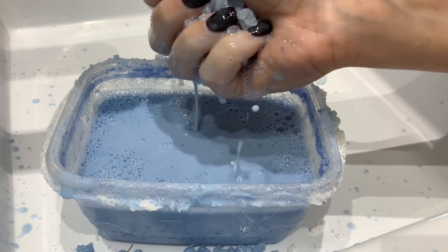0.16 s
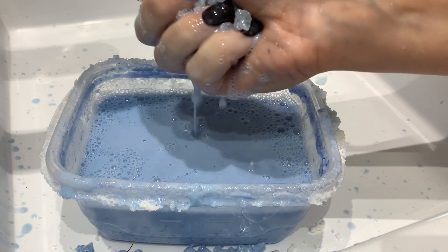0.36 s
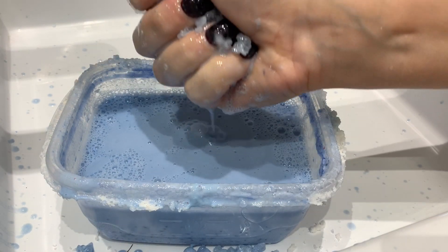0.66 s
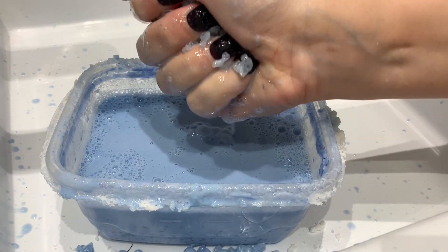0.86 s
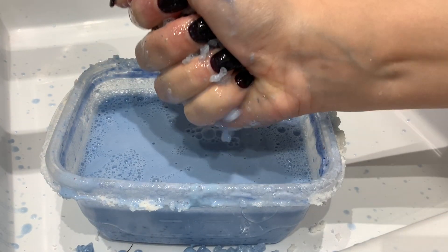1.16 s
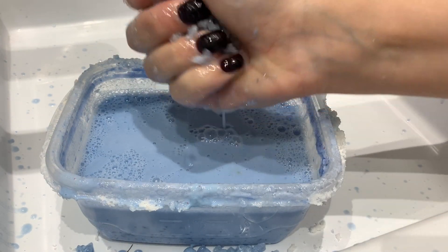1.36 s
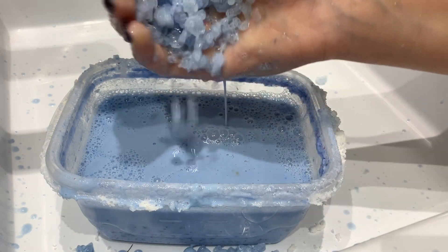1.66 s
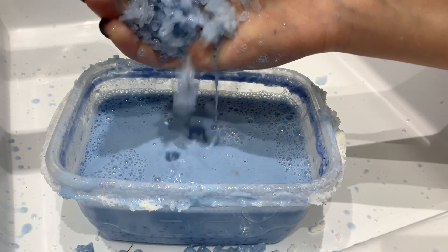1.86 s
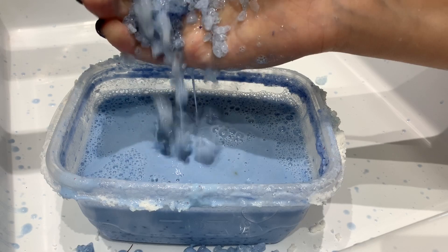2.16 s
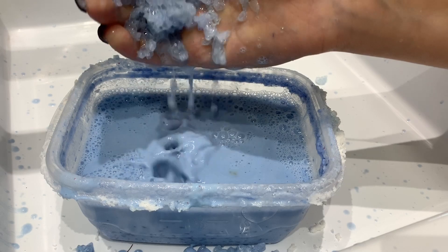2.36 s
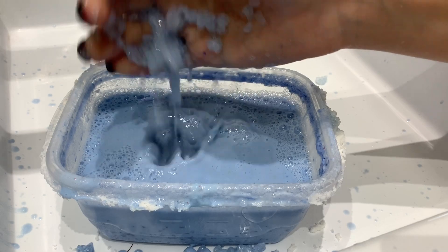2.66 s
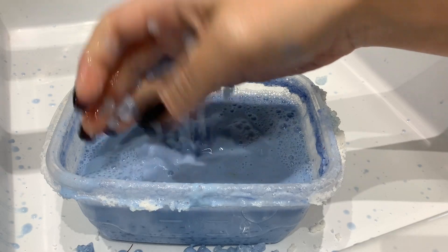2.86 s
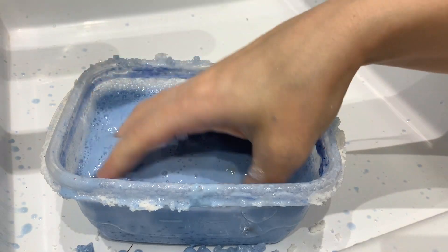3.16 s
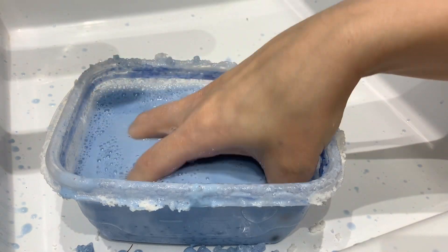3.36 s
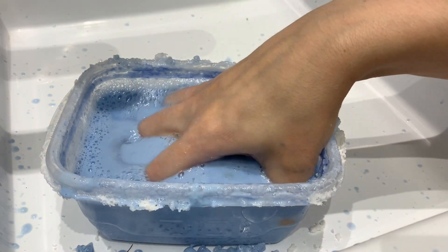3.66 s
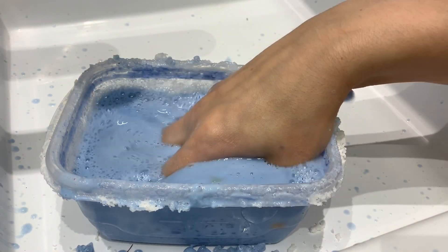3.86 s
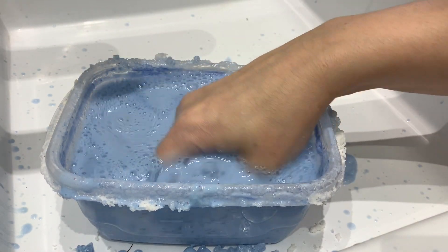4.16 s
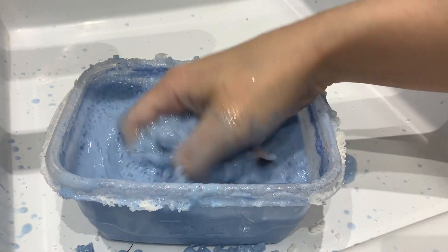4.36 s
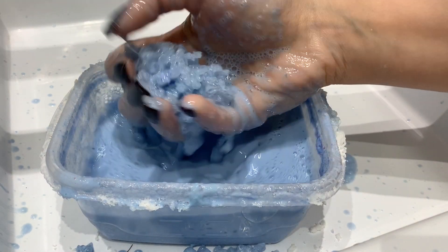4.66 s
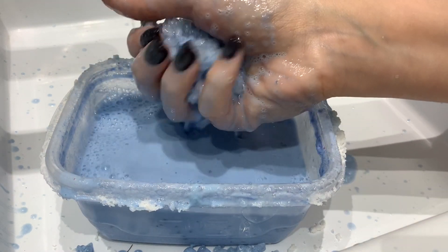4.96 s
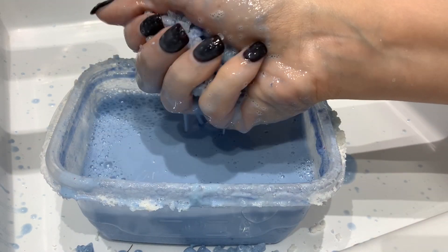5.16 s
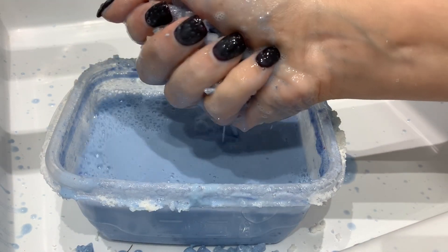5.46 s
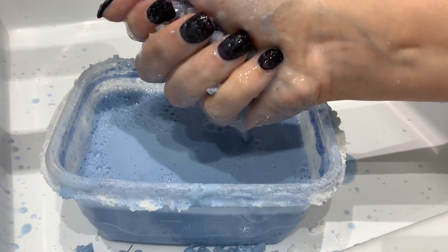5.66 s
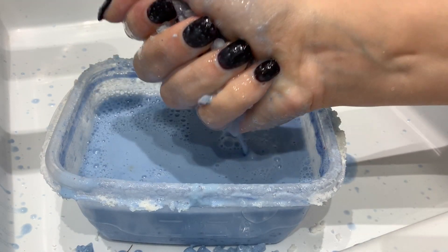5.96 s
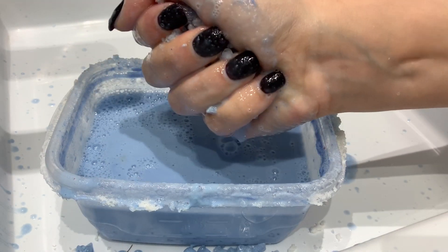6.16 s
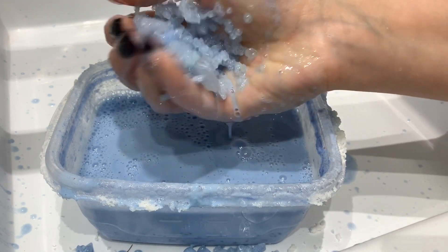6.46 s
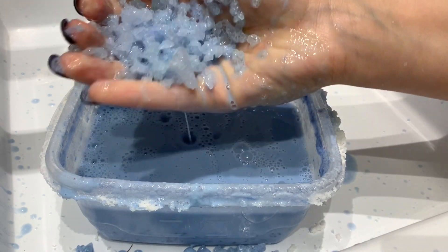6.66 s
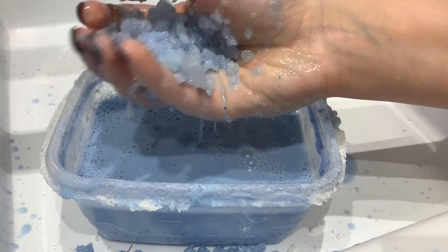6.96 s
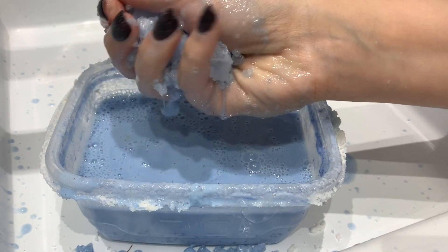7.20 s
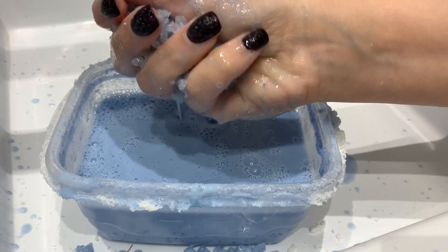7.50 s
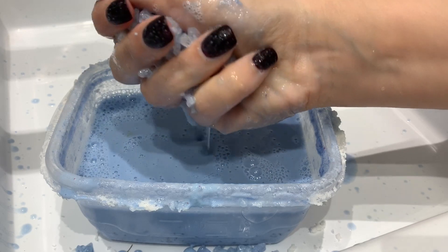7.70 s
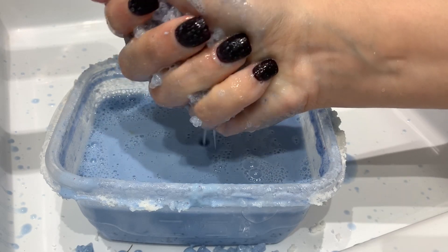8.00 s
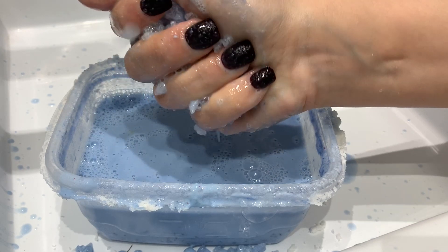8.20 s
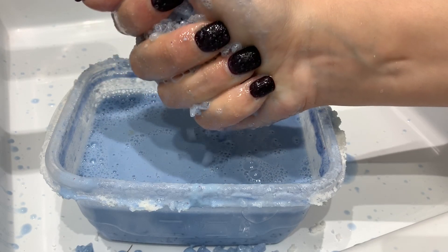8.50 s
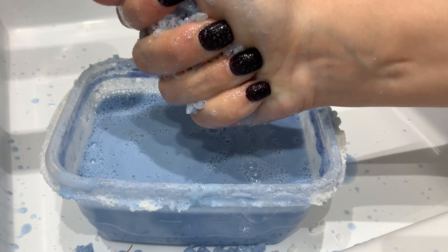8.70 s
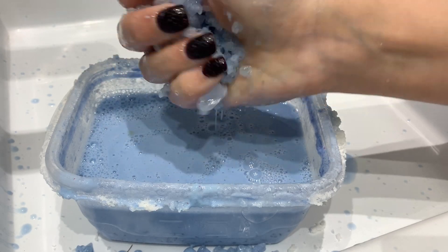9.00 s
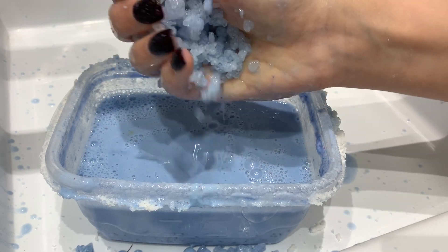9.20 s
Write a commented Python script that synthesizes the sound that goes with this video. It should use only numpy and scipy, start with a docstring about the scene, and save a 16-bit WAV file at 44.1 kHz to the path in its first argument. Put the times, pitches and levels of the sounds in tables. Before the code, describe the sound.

A steady low machine hum and faint room hiss run throughout. Very close, a few small drips open the scene, then from about 0.3 to 1.2 s a fist squeezes wet foamy crumbs: quick, crisp crackles with hollow, squelchy pops and dull tub knocks. A brief quiet follows. From 1.7 to 3 s come loose, bright wet ticks, fizzing and plopping drops, with a sharper smack near 2.7. From 3 to 4.9 s the hand dips and stirs: soft sloshing, gurgling, little bubbles, and muted low bumps around 3.2, 3.5 and 3.8. A second squeeze from 5.1 to 6.2 s is juicier, with the strongest thumps near 5.7 and 5.8. Light fizz and sparse ticks lead to a long, dense crackling squelch from 7.5 to 8.8 s, then scattered wet clicks and a few drops until about 9.3. Short plastic and basin reflections.

```python
"""A machine hums low in a room while foam fizzes and drops fall: a hand squeezes wet sponge crumbs
over a plastic tub in a sink, close by. Air pockets then burst in short crackling squelches that ring the tub.
Crackle, fizz and seeping are filtered random pops; bubbles are chirped decaying sines; tub and walls are
sums of damped modes. Rim and basin echo the hand, and two ports receive the sound with differing phase and level."""
import sys
import numpy as np
from scipy import signal
from scipy.fft import rfft, irfft, next_fast_len
from scipy.io import wavfile
from scipy.ndimage import uniform_filter1d

SR = 44100
rng = np.random.default_rng(int(sys.argv[2]) if len(sys.argv) > 2 else 0)


def master(y):
    """Save y as 16-bit WAV."""
    cut = np.clip(np.atleast_2d(y).T, -1, 1)
    pcm = np.round(cut * 32767)  # scale
    wavfile.write(sys.argv[1], SR, pcm.astype(np.int16))


N = 411894


def gain_of(db):
    """Decibels: 20 dB is a tenfold amplitude."""
    return 10 ** (np.asarray(db) / 20)


def evened(x):
    """Normalization to unit rms."""
    return x / np.sqrt(np.mean(x ** 2) + 1e-20)


def over_pitch(points, hz):
    """Interpolation of a spectrum along logarithmic frequency."""
    f, value = np.transpose(points)
    return np.interp(np.log(hz + 1), np.log(f + 1), value)


def over_time(points, t):
    """Linear interpolation of a level contour."""
    s, db = np.transpose(points)
    return np.interp(t, s, db)


def add(mix, start_s, sound):
    """Superposition of a sound onto the mix, cut off at its end."""
    part = mix[round(start_s * SR):][:len(sound)]
    part += sound[:len(part)]


def smoothed(x, width, axis=-1):
    """Slow random fluctuation: two moving averages, then unit rms."""
    once = uniform_filter1d(x, width, axis=axis)
    return evened(uniform_filter1d(once, width, axis=axis))


def coloured(x, spectrum):
    """Linear filtering by a spectrum, keeping the power of white noise."""
    size = next_fast_len(N + 4096)
    gain = evened(gain_of(over_pitch(spectrum, np.fft.rfftfreq(size, 1 / SR))))
    return irfft(rfft(x, size) * gain, size)[..., :N]


def joined(low, high, hz=7100.0):
    """Crossover: the lower band of one sound with the upper band of another."""
    low_pass = signal.butter(2, hz, "low", fs=SR, output="sos")
    high_pass = signal.butter(2, hz, "high", fs=SR, output="sos")
    return signal.sosfilt(low_pass, low) + signal.sosfilt(high_pass, high)


def rung(push, modes):
    """Modal resonance: damped modes of alternating sign answer a push; white noise keeps its power."""
    t = np.arange(4096) / SR
    ring = np.zeros(len(t))
    for k, (hz, width, db) in enumerate(modes):
        decay = np.exp(-np.pi * width * t)  # a wider resonance dies sooner
        ring += (-1) ** k * gain_of(db) * np.sqrt(width) * decay * np.sin(2 * np.pi * hz * t)
    return signal.oaconvolve(push, ring / np.linalg.norm(ring))[:N]


def grit(spread_db, per_s):
    """Shot noise: random pops of random sign and exponentially spread dB size, rms 1."""
    size = gain_of(spread_db * np.minimum(rng.exponential(1, N), 5))
    sign = rng.choice([-1., 1.], N)
    return evened(size * sign * (rng.random(N) < per_s / SR))


def bubble(hz, cycles, glide):
    """Bubble resonance: an air pocket rings for some cycles, its pitch rising as it shrinks."""
    turns = np.arange(round(5 * cycles * SR / hz)) * hz / SR
    envelope = (1 - np.exp(-turns / 0.4)) * np.exp(-turns / cycles)
    return envelope * np.sin(2 * np.pi * turns * (1 + glide * turns))


# Steady motor tones: pitch_hz [Hz], level_db [dB rms, before the port tilt]
HUM_TONES = [(23.4, -29), (96.0, -35), (164, -59.5)]
# Spectrum of the room noise: frequency_hz [Hz], density_db [dB per Hz, relative]
AIR_SPECTRUM = [(28, -20), (38, 11), (60, -2.5), (85, -6), (130, -11), (180, -11), (290, -24.5),
                (600, -25.5), (1000, -26), (3500, -34.5), (7000, -30.5), (12000, -103), (16000, -72)]
# Left-right coherence of the room noise: frequency_hz [Hz], likeness [0 to 1]
AIR_LIKENESS = [(130, 0.97), (250, 0.84), (600, 0.15), (1400, 0.25), (5000, 0.097)]
AIR_DB = -37.5  # rms level of the room noise before the port tilt


def room():
    """Tonal and diffuse sound: wavering motor tones over a partly coherent broad rumble and hiss."""
    t = np.arange(N) / SR
    waver_db = .5 * smoothed(rng.standard_normal(N), 6000)
    hum = sum(np.sqrt(2) * gain_of(db + waver_db) * np.sin(2 * np.pi * (hz * t + rng.random()))
              for hz, db in HUM_TONES)
    left, other = rfft(rng.standard_normal((2, N)))
    alike = np.clip(over_pitch(AIR_LIKENESS, np.fft.rfftfreq(N, 1 / SR)), 0, 1)
    air = irfft([left, alike * left + np.sqrt(1 - alike ** 2) * other], N)
    return hum + gain_of(AIR_DB) * coloured(air, AIR_SPECTRUM)


# Spectrum of the popping foam: frequency_hz [Hz], level_db [dB, relative]
FIZZ_SPECTRUM = [(2500, -24), (4300, -3), (5500, 6), (7000, 7.5), (7700, 6.5), (8500, 3.5), (10000, 3),
                 (12500, -2), (15100, -2.5), (15900, -22)]


def fizz(fizz_gain, a, b):
    """Clustered shot noise: tiny foam bubbles pop in clumps, the treble clumping differently."""
    small = gain_of(4.8 * a) * grit(spread_db=0.0, per_s=7000.)
    smaller = gain_of(1.7 * a + 1.23 * b) * grit(spread_db=4.0, per_s=5300.0)
    return coloured(gain_of(-2.0) * fizz_gain * joined(small, smaller), FIZZ_SPECTRUM)


# Spectrum of wet slaps and seeping: frequency_hz [Hz], level_db [dB, relative]
SLAP_SPECTRUM = [(500, -40), (1250, 3.5), (1800, 9), (2500, 6), (3300, 7), (4400, 6), (6000, -70)]


def seepage(seep_gain, a, c):
    """Modulated shot noise: liquid seeps between the crumbs in fluctuating pops."""
    pops = gain_of(1.47 * a + 2.9 * c) * grit(spread_db=2.5, per_s=5000.)
    return gain_of(-5.5) * coloured(seep_gain * pops, SLAP_SPECTRUM)


def bubble_swarm(pitches_hz, spread_db, per_s, cycles, glide):
    """Superposed bubble resonances struck at random, each pitch at equal power, rms 1."""
    voices = [signal.oaconvolve(grit(spread_db, per_s), bubble(hz, cycles, glide))[:N] for hz in pitches_hz]
    return evened(sum(evened(voice) for voice in voices))


# Modes of the tub: pitch_hz [Hz], width_hz [Hz], level_db [dB, relative]
TUB_MODES = [(405.7, 9.7, -1), (575, 214, 8), (944, 89, 10.5), (1275, 140, 9.5), (1650, 190, 9),
             (2200, 910, 9), (3000, 790, 5.5)]


def wash(stir_gain, seep_gain, a, c):
    """Driven resonance: sloshing rings the tub, with gurgling and trickling bubbles."""
    pops = gain_of(2.4 * a + 1.5 * c) * grit(spread_db=1.0, per_s=6000.)
    tub = rung(stir_gain * pops, TUB_MODES)
    deep = np.clip(stir_gain / seep_gain, 0, 1) ** 2.0  # thin trickles hardly stir the low modes
    tub = joined(deep * tub, tub, hz=680.0)
    gurgle = bubble_swarm(np.geomspace(480, 3200, 12), spread_db=2.5, per_s=300., cycles=9.2, glide=0.0103)
    trickle = bubble_swarm(np.geomspace(1300, 4300, 8), spread_db=4.5, per_s=47.0, cycles=17.0, glide=0.0104)
    flow = tub + gain_of(-3.0) * seep_gain * trickle
    return gain_of(-8.0) * flow + gain_of(-12.0) * stir_gain * deep * gurgle


# Timed bursting air pockets, loud and faint: start_s [s], level_db [crack dB, relative],
# ring_db [dB over the crack], pitch_hz [Hz], length_s [s, held to 0.0005-0.012 when played]
TIMED_POCKETS = [(0.2704, -16, -20, 1006, 0.0028), (0.3298, -20, 1, 970, 0.0034),
                 (0.403, -15.5, -1.5, 915, 0.0016), (0.438, -12.5, 3, 930, 0.0022),
                 (0.498, -8.5, -4.5, 562, 0.002), (0.5693, -7, -0.5, 970, 0.0024),
                 (0.6355, -5.5, 2, 580, 0.002), (0.698, -6.5, -8.5, 575, 0.0015),
                 (0.7459, -4.5, 1.5, 1190, 0.0025), (0.8233, -4.5, -7, 1240, 0.0024),
                 (.889, -3, -8.5, 590, 0.0023), (0.9316, -13.5, 1, 1365, 0.0015),
                 (0.9542, -0.5, -6, 580, 0.0018), (1.011, -8, -8, 1220, 0.0017),
                 (1.0177, -0.5, -3, 600, 0.0015), (1.038, -10, -16, 520, 0.0031),
                 (1.1347, -6, -11, 1080, 0.00086), (1.185, -4.5, -1.5, 956, 0.0024),
                 (1.6915, -12.5, -22, 850, 0.00073), (1.991, -8, -20, 1400, 0.00049),
                 (2.055, -11, -37, 790, 0.00046), (2.043, -19, -39, 1360, 0.00058),
                 (2.23, -20, -23, 1210, 0.002), (2.272, -13, -16, 1330, 0.0034),
                 (2.2864, -15, -8, 1320, 0.0031), (2.395, -14, -23.5, 830, 0.001),
                 (2.687, 2, -21, 1040, 0.0013), (2.746, -22, -15, 1100, 0.0023),
                 (2.8233, -10, -12.5, 1420, 0.0036), (3.024, -10.5, -46, 790, 0.0014),
                 (3.031, -18, -38, 980, 0.0018), (4.8104, -12.5, -15, 1350, 0.00065),
                 (5.205, -17.5, -12, 804, 0.0034), (5.249, -19, -2.5, 922, 0.0025),
                 (5.319, -6.5, -6.5, 980, 0.00072), (5.37, -10, -4.5, 1470, 0.0087),
                 (5.3956, -10.5, -4.5, 940, 0.0049), (5.412, -3, -17, 1390, 0.0013),
                 (5.457, -10, -7.5, 1000, 0.0048), (5.487, -10.5, -4, 1000, 0.0028),
                 (5.5388, -6.5, -4.5, 1390, 0.0022), (5.546, -12, -4.5, 564, 0.0033),
                 (5.581, -13, -2, 1340, 0.002), (5.6848, -6, 2, 1017, 0.0014),
                 (5.79, -23, 7.5, 1320, 0.0017), (5.8194, 1.5, -5.5, 1196, 0.0015),
                 (5.906, -5, -3.5, 1430, 0.0019), (5.9542, -7.5, 0.5, 1400, 0.00048),
                 (5.9688, -9.5, -2.5, 550, 0.0038), (6.0496, -3.5, -6.5, 587, 0.0016),
                 (6.0778, -3, -11.5, 580, 0.0009), (6.163, -4.5, -6.5, 560, 0.0026),
                 (7.5198, -15, -4.5, 1080, 0.0034), (7.548, -16.5, -5.5, 1390, 0.0033),
                 (7.621, -0.5, -16, 1200, 0.00065), (7.699, -9.5, -42, 1400, 0.0026),
                 (7.742, -9.5, -12, 1190, 0.0016), (7.809, -16, -6, 1230, 0.0013),
                 (7.8247, -5.5, -12.5, 1170, 0.0033), (7.877, -6.5, -2.5, 1230, 0.0041),
                 (7.9256, -13, -8, 460, 0.0075), (7.948, -11, -7.5, 620, 0.0038),
                 (7.994, -11, -8, 950, 0.0028), (8.0088, -4, -8.5, 600, 0.0024),
                 (8.0286, -5, -15, 1000, 0.00049), (8.051, -5.5, -10, 585, 0.0025),
                 (8.0602, 2, -13.5, 940, 0.00045), (8.113, -9, -7, 1220, 0.0012),
                 (8.154, -14, -22, 760, 0.00043), (8.181, -1.5, -7, 1140, 0.0025),
                 (8.195, -10, -27, 915, 0.0041), (8.2196, -1, -18, 1160, 0.00031),
                 (8.2468, -10.5, -6, 582, 0.0031), (8.323, -20, 5, 580, 0.00085),
                 (8.382, -9.5, 1, 566, 0.00094), (8.42, -6.5, -34, 930, 0.0019),
                 (8.45, -13, -5, 1090, 0.0022), (8.491, -2.5, -27, 1220, 0.00055),
                 (8.5054, -9.5, -20, 546, 0.0013), (8.5243, -7.5, -10, 1250, 0.0025),
                 (8.564, -16, 2.5, 1360, 0.001), (8.5905, -5, -8, 520, 0.0014),
                 (8.6597, -11, -1.5, 1010, 0.0032), (8.7801, -7, -6.5, 1450, 0.0014),
                 (8.998, -15.5, -4.5, 1250, 0.0034), (0.0754, -19, -5, 1700, 0.0034),
                 (0.091, -22, -16, 1860, 0.0025), (0.191, -19, -34, 2340, 0.0022),
                 (0.304, -22.5, -2, 980, 0.0022), (0.5396, -15, -4, 940, 0.001),
                 (0.624, -19, -1, 1730, 0.0018), (0.7068, -11, -13, 580, 0.0014),
                 (1.108, -16.5, 3.5, 1000, 0.00096), (1.143, -27, -11, 1160, 0.0013),
                 (1.7505, -18, -28, 1560, 0.0011), (1.762, -9.5, -24, 2270, 0.0009),
                 (1.805, -15, -45, 2280, 0.0013), (1.82, -26, -36, 2380, 0.0017),
                 (1.971, -15, -31, 1750, 0.0014), (2.0944, -9, -31, 2090, 0.00094),
                 (2.106, -30.5, -19, 2090, 0.001), (2.135, -25, -25, 2390, 0.0014),
                 (2.19, -29, -25, 2270, 0.0015), (2.367, -21, -24, 900, 0.0015),
                 (2.414, -19, -17, 1280, 0.0015), (2.534, -19.5, -18, 2300, 0.001),
                 (2.5553, -17, -19, 2360, 0.00099), (2.5705, -15, -12, 1730, 0.00096),
                 (2.629, -24, 1, 2290, 0.0013), (2.7555, -10.5, -12, 1050, 0.0016),
                 (2.9144, -16, -23, 1960, 0.0013), (2.931, -13, -25, 1910, 0.0012),
                 (5.13, -17.5, -5, 1690, 0.0012), (5.148, -17, -11, 1640, 0.0021),
                 (5.1678, -31, -21, 2100, 0.0015), (5.221, -15, -22, 2390, 0.0013),
                 (5.431, -14, -12, 990, 0.0015), (5.933, -18, -10, 1320, 0.0015),
                 (6.454, -14.5, -11, 2150, 0.0014), (6.5402, -24, -25, 1850, 0.0014),
                 (6.5541, -15.5, -27, 1910, 0.00095), (6.5947, -31, -20, 2100, 0.0013),
                 (6.923, -20.5, -29, 810, 0.00078), (7.2163, -16, -16, 2360, 0.002),
                 (7.342, -20, -30, 1210, 0.0015), (7.36, -27, -22, 1630, 0.0013),
                 (7.6447, -29, -13, 1400, 0.0014), (7.714, -12, -12, 2090, 0.0016),
                 (7.759, -16.5, -4, 1270, 0.00067), (7.774, -18, -19, 1220, 0.0015),
                 (7.865, -23, -5, 1540, 0.0012), (7.962, -9, -16, 1320, 0.0013),
                 (7.979, -13, -2, 2390, 0.0016), (8.022, -15, -5, 1240, 0.0017),
                 (8.04, -15, -5, 1720, 0.0021), (8.09, -25, 8, 1230, 0.0016),
                 (8.233, -17, -10, 566, 0.0021), (8.2613, -23, 5, 580, 0.0016),
                 (8.3589, -20, -21, 1890, 0.00064), (8.3776, -6.5, -41.5, 880, 0.0013),
                 (8.4764, -11.5, -7.5, 590, 0.00065), (8.533, -24, 0, 1210, 0.0012),
                 (8.571, -16, -5, 573, 0.0021), (8.6284, -25, 6, 580, 0.0013),
                 (8.6376, -21, -11, 570, 0.0018), (8.701, -13, -13, 900, 0.0012),
                 (9.02, -15, -11, 1640, 0.0026), (9.039, -15, -9, 2040, 0.0016),
                 (9.1874, -19, -29, 2390, 0.0014), (9.2055, -15.5, -24, 1920, 0.0014),
                 (9.2605, -21, -4, 2090, 0.0016)]
AFTER_S = 0.038  # amplitude decay time of the rush into a burst pocket
SWELL_S = 0.0052  # the rush takes a moment to set in, and the basin echoes to arrive
BEFORE_S = 0.0028  # fade-in time of the level ahead of each burst


def rush(hollow):
    """Energy relaxation: a level climbs into each timed burst and dies; hollow weighs in the ring level."""
    power = np.zeros(N)
    for s, db, ring_db, *_ in TIMED_POCKETS:
        add(power, s, gain_of([2 * (db + hollow * ring_db)]))
    after = signal.lfilter([1], [1, -np.exp(-2 / (AFTER_S * SR))], power)
    after = signal.oaconvolve(after, np.hanning(round(2 * SWELL_S * SR)) / (SWELL_S * SR))[:N]
    before = signal.lfilter([1], [1, -np.exp(-2 / (BEFORE_S * SR))], power[::-1])[::-1]
    return np.sqrt(abs(after) + before)


# Foam worked between the fingers: start_s [s], level_db [wringing dB, relative]
WRINGING = [(0, -34.5), (.15, -34.5), (.35, -50), (.55, -36.5), (1.2, -62), (1.3, -50), (1.5, -38),
            (1.8, -37), (2.05, -37), (2.3, -30.5), (2.4, -42), (2.65, -33.5), (2.8, -31.5), (3.0, -47),
            (3.3, -49), (3.45, -39.5), (3.8, -38), (3.95, -59), (4.1, -38), (4.2, -57), (4.4, -35),
            (4.6, -44.5), (4.9, -46), (5.0, -36), (5.2, -34), (5.5, -63), (5.7, -38), (6.15, -70),
            (6.3, -50), (6.4, -34), (6.6, -35), (6.8, -71), (6.9, -49.5), (7.1, -42), (7.25, -34),
            (7.8, -37), (8.1, -36), (8.55, -35), (8.9, -46), (9.0, -30.5), (9.1, -36.5), (9.34, -43)]
# Liquid moved in the fist and the tub: start_s [s], level_db [slosh dB, relative]
SLOSHING = [(0, -35), (.25, -42.5), (.5, -29.5), (1.15, -32), (1.3, -41), (1.8, -53), (2.3, -65),
            (2.4, -38), (2.6, -44), (2.8, -35), (3.05, -44), (3.2, -30.5), (3.6, -26.5), (3.8, -33),
            (4.2, -36), (4.35, -35), (4.9, -43.5), (5.3, -32), (5.6, -37), (6.1, -53), (6.4, -35.5),
            (6.7, -50), (7.05, -42.5), (7.4, -43.5), (7.6, -34.5), (8.0, -31), (8.6, -32), (9.0, -41.5),
            (9.2, -57), (9.34, -61)]
# How much liquid seeps for a given wringing: start_s [s], level_db [dB over the wringing]
WETNESS_CURVE = [(0, 2.5), (.7, -5.5), (1.6, -1.5), (2.0, -4.5), (2.75, 0.5), (3.3, -2.5), (4.6, 1),
                 (5.3, 1.5), (5.9, -3), (6.5, 0), (7.3, -2.5), (8.3, -7), (9.34, -0.5)]
# Rush around each burst for fizz, seep and slosh in turn: level_db [dB relative to the crack]
RUSH_DB = (-24, -23, -18)
SEEP_FROM_SLOSH = 0.032  # share of the slosh level; seeping follows mostly the wringing


def foam():
    """Energy addition: steady handling and the rush around bursts together drive fizz, seeping and wash."""
    t = np.arange(N) / SR
    wring_db, slosh_db = over_time(WRINGING, t), over_time(SLOSHING, t)
    seep_db = wring_db + SEEP_FROM_SLOSH * (slosh_db - wring_db)
    fizz_after_db, seep_after_db, slosh_after_db = RUSH_DB
    fizz_gain = np.hypot(gain_of(wring_db), gain_of(fizz_after_db) * rush(0.024))
    seep_gain = np.hypot(gain_of(seep_db), gain_of(seep_after_db) * rush(0.15))
    stir_gain = np.hypot(gain_of(slosh_db), gain_of(slosh_after_db) * rush(0.73))
    seep_gain = seep_gain * gain_of(over_time(WETNESS_CURVE, t))
    a, b, c = smoothed(rng.standard_normal((3, N)), 170)  # shared random flutter clumps the pops
    return fizz(fizz_gain, a, b) + seepage(seep_gain, a, c) + wash(stir_gain, seep_gain, a, c)


# Drops and crumbs fall into the liquid: start_s [s], level_db [dB, relative], pitch_hz [bubble Hz]
DROPS = [(0.027, -22.5, 1060), (0.043, -30, 830), (0.075, -20, 1670), (0.096, -33, 910), (0.093, -23, 2300),
         (1.983, -23.5, 1910), (2.011, -30, 1380), (2.104, -24.5, 2080), (2.252, -21.5, 1290),
         (2.296, -24.5, 1050), (2.417, -22, 1186), (2.687, -14, 1010), (2.731, -21, 1140), (2.78, -23, 715),
         (2.825, -18.5, 1770), (2.85, -29, 1770), (2.936, -28, 1110), (3.107, -29.5, 975),
         (3.168, -30, 1170), (3.234, -26, 1160), (3.249, -35, 610), (3.289, -31, 1170), (3.455, -27.5, 600),
         (3.5, -29, 580), (3.54, -32, 540), (3.766, -27, 555), (3.599, -24, 725), (3.636, -41, 940),
         (3.831, -30, 613), (3.833, -24, 2310), (4.105, -33.5, 650), (4.29, -31, 610), (4.344, -25.5, 1220),
         (4.528, -33, 1140), (4.694, -31, 1270), (4.376, -26, 1240), (4.493, -30, 1880), (4.575, -29, 900),
         (4.618, -24, 1400), (4.922, -33, 2580), (4.962, -26, 2300), (6.429, -30, 910), (8.98, -24, 1680),
         (9.261, -24, 2100)]
SPLASH_DB, SPLASH_S = -14, 0.025  # spray of other bubbles: dB relative to the drop, decay time in s


def drips():
    """Bubble entrainment: each drop traps one ringing bubble, and a spray of others near its pitch follows."""
    out, t = np.zeros(N), np.arange(4000) / SR
    for s, db, hz in DROPS:
        add(out, s, gain_of(db) * bubble(hz, cycles=5.2, glide=0.0028))
        ring = bubble(1.106 * hz, cycles=1.52, glide=0.0098)
        spray = rng.standard_normal(len(t)) * np.exp(-t / SPLASH_S)
        splash = signal.fftconvolve(spray, ring / np.linalg.norm(ring))
        add(out, s, gain_of(db + SPLASH_DB) * splash)
    return out


SMALL_DB, SMALL_RING_DB, SMALL_S = 5, -18.5, 0.0012  # crack offset dB, mean ring over crack dB, base length s
SMALL_GROWTH, FULL_DB = 3, -36.5  # small pockets swell faster than the wringing, about this level in dB


def pockets(count=500):
    """Random point process: small pockets at random moments, growing with the wringing, join the timed ones."""
    s, ring, pitch, length = rng.random((count, 4)).T
    s = s * (N / SR - .05) + 0.01
    grip_db = FULL_DB + SMALL_GROWTH * (over_time(WRINGING, s) - FULL_DB)
    db = grip_db - 1.8 * over_time(WETNESS_CURVE, s) + SMALL_DB  # wetter foam cracks less
    ring_db = SMALL_RING_DB + 14 * (ring - .5)
    small = np.transpose([s, db, ring_db, 800 * 2.4 ** pitch, SMALL_S * (1.03 + length)])
    return np.concatenate([TIMED_POCKETS, small])


# Spectrum of the crackle: frequency_hz [Hz], level_db [dB, relative]
CRACK_SPECTRUM = [(2500, -25), (3300, -10.5), (4300, -7.5), (5500, 3), (7000, 5.5), (7700, 6), (8500, 7),
                  (10000, 2.5), (12500, -1), (15100, -3.5), (15900, -32)]
SLAP_DB, SLAP_PER_RING = -4.5, 0.51  # wet slap over the crack in dB: hollower pockets slap harder
TEAR, FALL = .5, 1.695  # rise and fall of a burst, as shares of its length
SNAP = 1.35  # exponent: how abruptly a burst ends


def squelches():
    """Impulsive excitation: a pocket tears in dense pops, slaps shut, rings at its pitch and shakes the tub."""
    crack, hiss, slap, shake, ring = np.zeros((5, N))
    t = np.arange(-300, 1200) / SR
    pops, spray = grit(spread_db=-0.5, per_s=14000.), grit(spread_db=1.5, per_s=14000.)
    for s, db, ring_db, hz, length in pockets():
        u = t / np.clip(length, .0005, .012)
        envelope = np.where(u < 0, np.exp(-abs(u / TEAR) ** 1.15), np.exp(-abs(u / FALL) ** SNAP))
        shape = gain_of(db) * envelope
        start = s + t[0]
        add(crack, start, shape)
        add(hiss, start, shape * gain_of(3.04 * rng.standard_normal()))  # brightness varies by burst
        add(slap, start, shape * gain_of(SLAP_DB + SLAP_PER_RING * ring_db))
        push_db = ring_db - 5.5 * np.log2(hz / 600)  # small pockets push less
        add(shake, start + 0.0018, shape * gain_of(push_db))
        struck = shape * spray[round(s * SR):][:len(t)]
        pocket = signal.fftconvolve(struck, bubble(hz, cycles=3.25, glide=0.0013))
        add(ring, start + 0.9 / hz, gain_of(db + ring_db) * pocket / abs(pocket).max())
    crackle = gain_of(-5.0) * coloured(joined(crack * pops, hiss * spray), CRACK_SPECTRUM)
    tub = gain_of(-5.5) * rung(shake * pops, TUB_MODES)
    slaps = gain_of(-4.5) * coloured(slap * spray, SLAP_SPECTRUM)
    return crackle + gain_of(-8.5) * ring + tub + slaps


# The hardest squeezes shake the tub: start_s [s], level_db [shove peak dB, relative]
SHOVES = [(0.43, -49), (0.564, -52), (0.636, -27), (0.752, -29.5), (0.96, -24), (1.02, -31), (1.681, -32),
          (2.686, -33), (5.681, -16), (5.821, -12.5), (5.968, -22), (6.053, -27), (6.166, -22.5),
          (8.012, -38)]
# Low wall modes of the tub: pitch_hz [Hz], width_hz [Hz], level_db [dB, relative]
WALL_MODES = [(183, 18, 8), (256, 7.8, 9), (317.6, 5.4, 11), (438, 11, -4)]


def thumps():
    """Forced and free vibration: a short shove is heard as a dull push and rings the low wall modes."""
    shove = np.zeros(N)
    for s, db in SHOVES:
        add(shove, s, gain_of(db) * np.hanning(60))
    push = signal.sosfilt(signal.butter(2, 160., "high", fs=SR, output="sos"), shove)
    return gain_of(-9.5) * rung(shove, WALL_MODES) + gain_of(-6.5) * push


# Fingers bump the tub floor: start_s [s], level_db [dB, before onset and decay], pitch_hz [Hz]
FLOOR_BUMPS = [(3.247, -30, 106), (3.547, -32, 112), (3.79, -24.5, 109)]


def bumps():
    """Damped oscillation: a soft, slow ring of the tub floor, falling 60 dB in 0.3 s."""
    out, t = np.zeros(N), np.arange(8000) / SR
    for s, db, hz in FLOOR_BUMPS:
        envelope = gain_of(db - 60 * t / 0.3) * (1 - np.exp(-t / 0.0031))
        add(out, s, envelope * np.sin(2 * np.pi * hz * t))
    return out


# Wander of phase between the ports: frequency_hz [Hz], wander_rad [radians, scaled by the share]
PHASE_WANDER = [(300, 0.34), (900, 0.61), (1300, 1.9), (2500, 0.58), (3300, 1.3), (4500, 4.8), (5600, 0.23),
                (9000, 0.11), (15000, .5)]


def scattered(x, share):
    """Phase difference: bubbles burst all over hand and tub, so port phase wanders in time and pitch."""
    hz, t, z = signal.stft(x, SR, nperseg=256, noverlap=192)
    place = uniform_filter1d(rng.standard_normal((len(t), len(hz))), size=10, axis=0)
    place = evened(uniform_filter1d(place, size=3, axis=1)).T
    turn = np.exp(.5j * share * over_pitch(PHASE_WANDER, hz)[:, None] * place)
    return signal.istft([z * turn, z / turn], SR, nperseg=256, noverlap=192)[1][:, :N]


def shifting(per_s):
    """Power-complementary crossfade: three shares take turns at a steady rate; their powers sum to one."""
    place = 2 * np.pi * per_s * np.arange(N) / SR
    return [np.sqrt(2 / 3) * np.cos(place + k * np.pi / 3) for k in range(3)]


# Near reflections: frequency_hz [Hz], level_db [dB over the direct sound]
NEAR_ECHO = [(400, -5.5), (1200, -6.5), (2400, -2.5), (3000, -1.5), (4900, -0.5), (5600, -9),
             (15000, -32.5)]


def rim(x):
    """Early reflection: rim, hand and liquid echo quickly, unlike at each port and changing steadily."""
    taps = rng.standard_normal((3, 2, 130)) * gain_of(-20 * np.arange(130) / 130)
    taps = taps / np.linalg.norm(taps, axis=2, keepdims=True)
    near = irfft(rfft(x) * gain_of(over_pitch(NEAR_ECHO, np.fft.rfftfreq(N, 1 / SR))), N)
    return sum(signal.oaconvolve((near * share)[None], tap, axes=1)[:, :N]
               for share, tap in zip(shifting(7.0), taps))


# Reverberation of basin and walls: frequency_hz [Hz], t60_s [s to fall 60 dB]
SINK_DECAY = [(300, 0.51), (1000, 0.3), (4000, 0.078), (12000, 0.0047)]
ECHO_MONO_HZ = 860  # well below this the echoes are most alike at both ports


def sink(x):
    """Reverberation: sparse basin and wall echoes, each band dying at its own speed, change steadily."""
    taps = np.zeros((3, 2, SR // 3))
    jitter = rng.integers(0, 20, (3, 2, (SR // 3 - 41) // 20))
    at = np.arange(40, SR // 3 - 20, 20) + jitter  # one echo in every 20 samples
    np.put_along_axis(taps, at, rng.choice([-1., 1.], at.shape), 2)
    hz, t, z = signal.stft(taps, SR, nperseg=256)
    alike = 0.59 / (1 + (hz[:, None] / ECHO_MONO_HZ) ** 4)
    z = np.stack([z[:, 0], alike * z[:, 0] + np.sqrt(1 - alike ** 2) * z[:, 1]], 1)
    swell = np.minimum(t / SWELL_S / 2, 1)
    decay = gain_of(-60 * t / over_pitch(SINK_DECAY, hz)[:, None])
    tails = signal.istft(z * swell * decay, SR, nperseg=256)[1]
    return sum(signal.fftconvolve((x * share)[None], tail / np.linalg.norm(tail[0]), axes=1)[:, :N]
               for share, tail in zip(shifting(3.3), tails))


def scene():
    """Superposition: direct sound, near reflections and reverberation of the hand, with tub and room."""
    bursts, liquid = squelches() + drips(), foam()
    hand = bursts + liquid
    # single bursts keep their place better than foam
    direct = scattered(bursts, share=.25) + scattered(liquid, share=0.71)
    echoed = joined(gain_of(-6.0) * hand, hand, hz=990.0)  # the hand shades the low ring from the basin
    return direct + rim(hand) + gain_of(-9.5) * sink(echoed) + thumps() + bumps() + room()


# Port phase, opposed in the middle, a plain delay in the treble: frequency_hz [Hz], left_lead_rad [radians]
LEFT_LEAD = [(1100, 0), (1350, 3.0), (3050, 3.2), (3250, 6.0), (3550, 5.3), (4250, 5.5), (5100, 6.9),
             (5900, 6.3), (8400, 3.14), (10950, 0), (13400, -3.14), (15600, -6.28)]
# Port level difference: frequency_hz [Hz], level_db [left over right, dB]
LEFT_TILT = [(200, -0.1), (300, 3), (450, 1.5), (1000, 4.5), (1600, 5), (2380, 2.5), (2900, 0.5),
             (4400, -3), (5500, 0)]
EDGE_HZ = 16500  # low-pass edge


def record(dry):
    """Two-port reception: the ports differ in phase and level, peaks clip, and a low-pass ends the band."""
    size = next_fast_len(N + 4096)
    hz = np.fft.rfftfreq(size, 1 / SR)
    left, right = rfft(dry, size)
    lead = np.interp(hz, *np.transpose(LEFT_LEAD))
    tilt = gain_of(over_pitch(LEFT_TILT, hz) / 2)  # half the difference to each port
    ports = irfft([left * tilt * np.exp(1j * lead), right / tilt], size)[:, :N]
    clipped = np.clip(ports, -1, 1)
    low_pass = signal.firwin(511, EDGE_HZ, window=("kaiser", 9), fs=SR)
    return signal.oaconvolve(clipped, low_pass[None], "same")


dry = scene()
out = record(dry)
master(out)
```